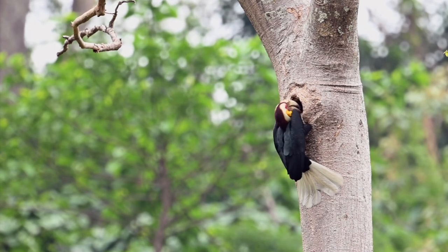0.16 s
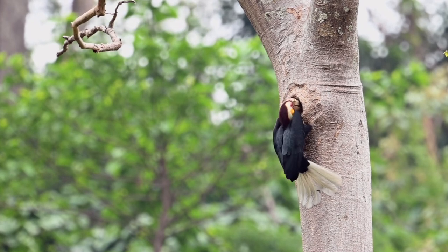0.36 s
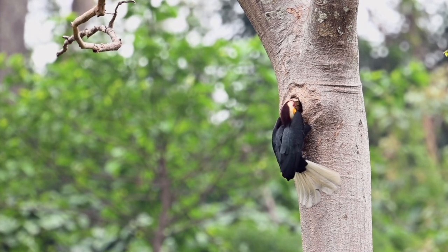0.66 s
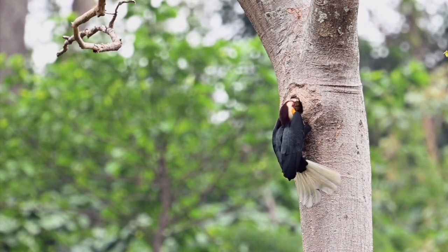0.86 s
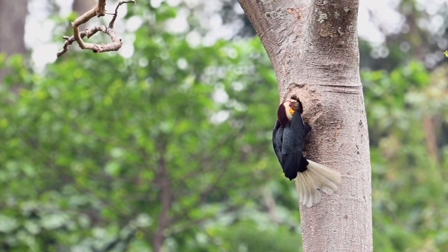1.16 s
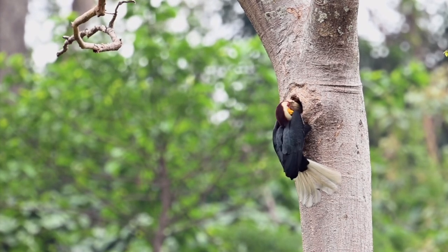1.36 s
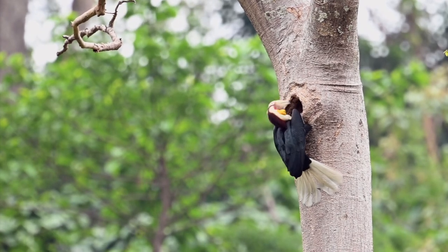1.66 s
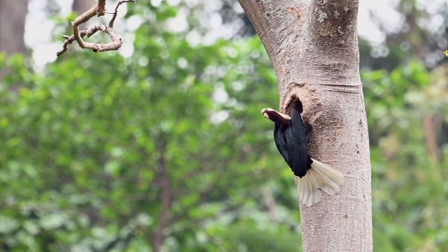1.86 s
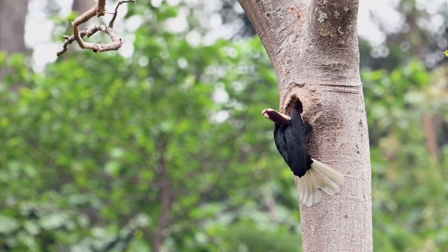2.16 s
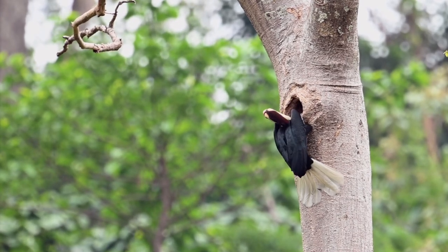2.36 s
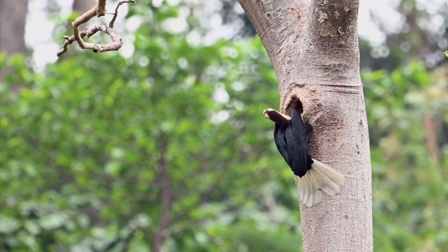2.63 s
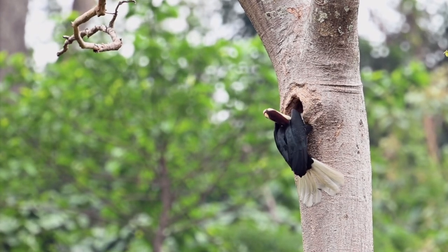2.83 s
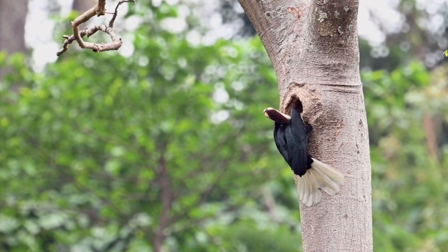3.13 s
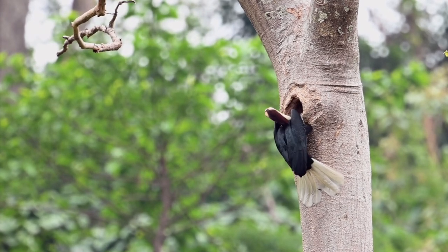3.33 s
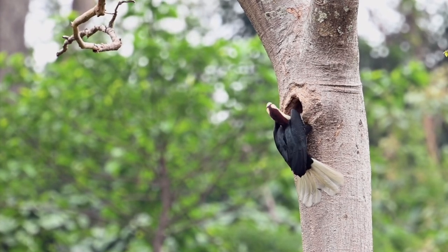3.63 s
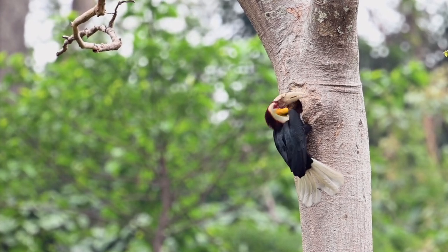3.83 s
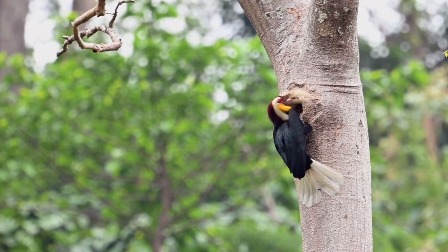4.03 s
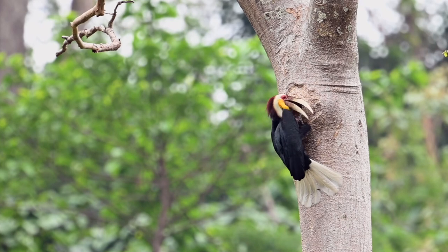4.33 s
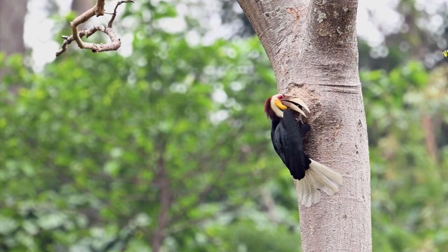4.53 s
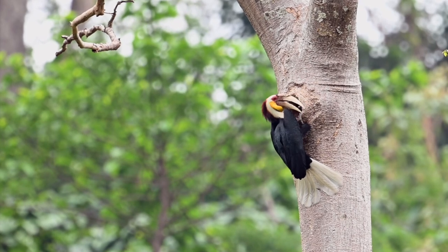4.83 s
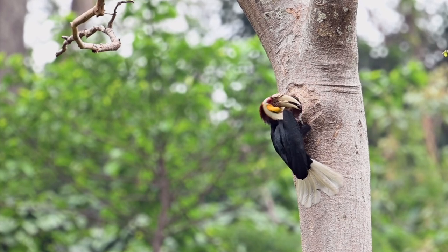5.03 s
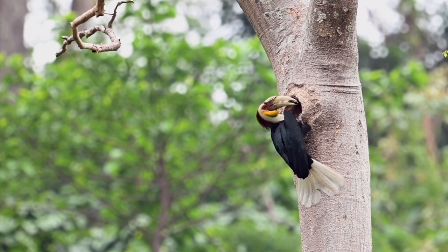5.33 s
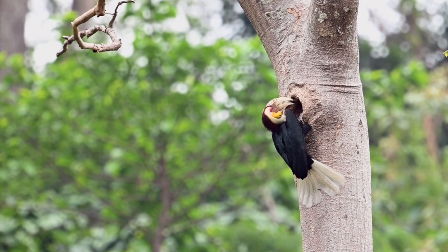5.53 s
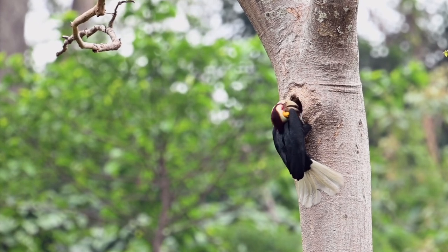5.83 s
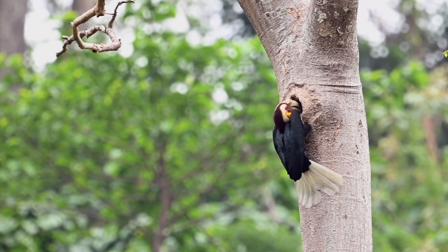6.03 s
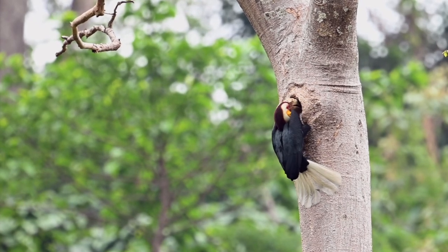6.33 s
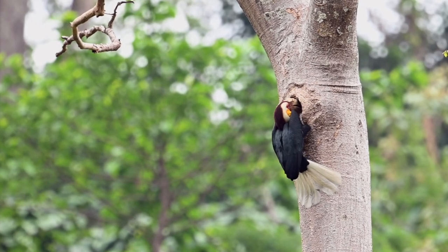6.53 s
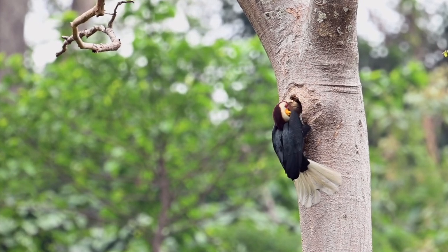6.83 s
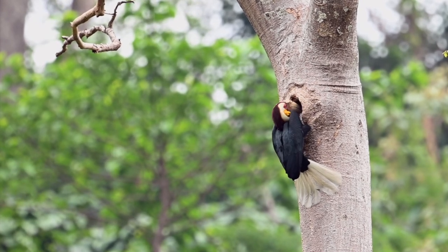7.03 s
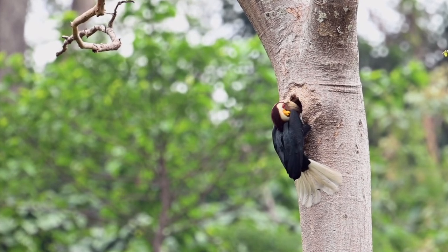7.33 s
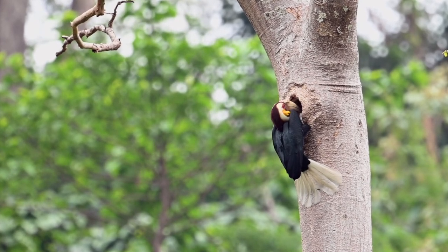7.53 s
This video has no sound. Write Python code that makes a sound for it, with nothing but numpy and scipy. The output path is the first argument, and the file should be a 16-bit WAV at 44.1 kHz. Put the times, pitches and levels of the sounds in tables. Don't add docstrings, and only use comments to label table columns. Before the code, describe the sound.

In an open forest, a breezy outdoor stereo microphone picks up low fluttering rumble and soft knocks of wind, heaviest on the left around the middle. An even, piercing insect tone runs throughout. Distant birds repeat tiny descending notes about every half second. A begging chick gives breathy, scratchy calls near the start, middle and end; high chirps come in two bursts, with small dry ticks.

```python
import sys
import numpy as np
from scipy import signal
from scipy.fft import rfft, irfft
from scipy.io import wavfile
from scipy.ndimage import uniform_filter1d

SR = 44100
rng = np.random.default_rng(int(sys.argv[2]) if len(sys.argv) > 2 else 0)


def file_out(sig):
    cols = np.atleast_2d(sig).T
    lim = np.clip(cols, -1, 1)
    pcm = np.round(lim * 32767).astype(np.int16)
    wavfile.write(sys.argv[1], SR, pcm)


def gain_from_db(level_db):
    decades = np.asarray(level_db, float) / 20
    return 10 ** decades


N = 338688
T = np.arange(N) / SR
F = np.maximum(np.fft.rfftfreq(N, 1 / SR), 1)


def level(x, db):
    return x * gain_from_db(db) / np.sqrt(np.mean(x ** 2))


def colour(x, points):
    hz, db = np.transpose(points)
    gain_db = np.interp(np.log(F), np.log(hz), db, db[0] - 31, -200)
    return irfft(rfft(x) * gain_from_db(gain_db), N)


def walk(rate_hz):
    k = int(SR / rate_hz)
    held = np.repeat(rng.standard_normal(N // k + 1), k)
    x = uniform_filter1d(uniform_filter1d(held, k), k)[:N]
    return x / x.std()


def even(x, span_s, share):
    power = uniform_filter1d(x ** 2, int(span_s * SR)) / np.mean(x ** 2)
    return x / (power + 0.038) ** (share / 2)


def add(out, start_s, x):
    i = int(start_s * SR)
    x = x[max(-i, 0):N - i]
    out[max(i, 0):max(i, 0) + len(x)] += x


def place(x, pan_db, lag_ms, wet_db, t60):
    t = np.arange(int(t60 * SR)) / SR
    decay = np.exp(-np.log(1000) * t / t60) * (1 - np.exp(-t / 0.005))
    haze = rng.standard_normal((2, len(t))) * decay
    haze = haze / np.sqrt(np.sum(haze ** 2, 1, keepdims=True))
    left = irfft(rfft(x) * np.exp(-2j * np.pi * F * lag_ms / 1000), N)
    direct = np.array([left * gain_from_db(pan_db / 2), x * gain_from_db(-pan_db / 2)])
    return direct + gain_from_db(wet_db) * signal.fftconvolve(x[None], haze, axes=1)[:, :N]


def notes(rows, fade, flutter_db):
    out = np.zeros(N)
    for start_s, length_s, hz0, hz1, db, bend in rows:
        u = np.arange(int(length_s * SR)) / (length_s * SR)
        hz = hz1 + (hz0 - hz1) * (1 - u) ** bend
        shape = np.sin(np.pi * u) ** 0.12 * np.exp(-fade * u)
        add(out, start_s, gain_from_db(db + 6.0) * shape * np.sin(2 * np.pi * np.cumsum(hz) / SR))
    return out * gain_from_db(flutter_db * walk(200))


def phrases(phrase, starts):
    rows = []
    for start_s, db in starts:
        for offset_s, length_s, hz0, hz1, note_db, bend in phrase:
            a, b = rng.standard_normal(2)
            rows.append((start_s + offset_s, length_s, hz0 * (1 + 0.015 * a), hz1 * (1 + 0.014 * a),
                         db + note_db + 0.97 * b, bend))
    return rows


def leaves():
    # pitch_hz, level_db (per Hz)
    rustle_db = [(60, -39), (120, -44), (190, -16), (273, -9), (879, -11.5), (952, -9.5), (1050, -13),
                 (2650, -19), (3600, -25), (4680, -104), (7920, -120)]
    hiss_db = [(4100, -40), (4220, 0.5), (4700, 0.5), (5200, -5.5), (6300, -7), (8000, -5.5), (9000, -10.5),
               (12000, -15), (15600, -13.5), (15750, -60)]
    alike = np.interp(np.log(F), np.log([150, 500, 1400, 2500, 3300, 6000]), [.25, .65, .62, .1, -.3, .1])
    left, other = (rfft(rng.standard_normal(N)) for _ in range(2))
    pair = irfft([left, alike * left + np.sqrt(1 - alike ** 2) * other], N)
    rustle = level(colour(pair, rustle_db), -52) * gain_from_db(.6 * walk(3))
    hiss = irfft(rfft(colour(pair, hiss_db)) * (F > 3600), N)
    return rustle + level(hiss, -55.0) * gain_from_db(0.76 * walk(9) + np.array([[.8], [-.8]]))


def insects():
    # pitch_hz, spread_hz, level_db, left_minus_right_db, left_lead_rad, likeness (0-1)
    singers = [(3999, 23.3, -40.5, 5, 2, 0.89), (4089.4, 14.7, -37.5, 2.5, 2.5, 0.48),
               (3975, 15.4, -49.5, -12, 2, 0.5), (3946, 16.4, -46.5, -4, 3, 0.71),
               (3877, 22, -57.5, -13.5, 2, 0.26), (3820, 21, -56, 3, 2, 0.65),
               (4043, 16.4, -47, 1, 2.5, 0.5), (4140, 40, -64, 2, 3, 0.4), (3730, 37, -63, -2, 3, 0.6),
               (3596, 43, -68, 9, 1.5, 0.1), (3676, 8.3, -66, -12.5, 4.5, 0.54),
               (3238, 83, -61.5, 0, 3.5, 0.46), (4770, 80, -63.5, -2, -2.5, 0.96),
               (8200, 24, -75, -7, 0, 0.1), (8900, 28, -73.5, 1, 0.5, 0.2), (9535, 28, -73, 5, 1, 0.7),
               (10370, 32, -73.5, 9, -2, 0), (11240, 33, -77, 10, -1, 0.5), (12700, 60, -83, 1, 5, .1),
               (14700, 90, -84, 8, 1, 0)]
    # time_s, level_db
    swell = [(0, -36.5), (.3, -37.5), (1.2, -40.5), (1.5, -38), (2.3, -39.5), (2.5, -38.5), (2.8, -39.5),
             (3.4, -39), (3.7, -37), (4.1, -40.5), (4.9, -38), (5.5, -40.5), (6.1, -40.5), (6.7, -38),
             (7.1, -40.5), (7.4, -40), (7.68, -38)]
    out = np.zeros((2, N))
    for hz, spread_hz, db, pan_db, lead, alike in singers:
        alike = np.clip(alike, 0, 1)
        band = np.exp(-((F - hz) / spread_hz) ** 2 / 4)
        near, far = (rng.standard_normal((len(F), 2)) @ [1, 1j] * band for _ in range(2))
        pair = irfft([near * np.exp(1j * lead), alike * near + np.sqrt(1 - alike ** 2) * far], N)
        throb_db = .5 if hz < 5000 else 3
        sway_db = throb_db * walk(12) + np.array([[pan_db], [-pan_db]]) / 2
        out += level(even(pair, .05, .85), db) * gain_from_db(sway_db)
    s, db = np.transpose(swell)
    return out * gain_from_db(np.interp(T, s, db - db.mean()))


def crackle():
    # time_s, level_db
    twigs = [(0.666, -46), (1.151, -46), (1.508, -46), (2.845, -45), (3.286, -54), (4.782, -46),
             (4.827, -41), (4.894, -46), (5.004, -46), (5.57, -46), (6.495, -44), (7.055, -45)]
    ticks = np.zeros((2, N))
    for (at_s, db), pan_db in zip(twigs, rng.uniform(-6, 6, len(twigs))):
        ticks[:, int(at_s * SR)] = gain_from_db(db + 13.0 + np.array([pan_db, -pan_db]))
    return colour(ticks, [(7000, -30), (11000, -8), (14000, 0), (20000, 0)])


def mid_bird():
    # offset_s, length_s, first_hz, last_hz, level_db, bend
    phrase = [
        (.003, .019, 2210, 1350, 0, .7),
        (.053, .017, 2190, 1500, 1.5, .7),
        (.07, .018, 1500, 1440, -4, 1),
        (.163, .019, 2250, 1430, 1, .7),
        (.223, .036, 2030, 1545, -1, 4),
    ]
    # start_s, level_db
    starts = [(0.381, -53), (0.983, -49), (1.591, -54), (2.195, -56), (2.791, -56.5), (3.389, -60),
              (3.993, -51.5), (4.592, -51), (5.19, -57.5), (5.79, -57), (6.394, -57), (7.007, -55)]
    return place(notes(phrases(phrase, starts), fade=.7, flutter_db=1.2), -5, .12, wet_db=-6, t60=.6)


def echoed(x):
    # delay_s, level_db
    trunks = [
        (.037, -12.5),
        (.083, -13.5),
        (.15, -10.5),
    ]
    return x + sum(gain_from_db(db) * np.roll(x, int(s * SR)) for s, db in trunks)


def low_bird():
    # offset_s, length_s, first_hz, last_hz, level_db, bend
    phrase = [
        (.002, .021, 1340, 1130, 1, .5),
        (.02, .02, 1080, 870, -3.5, 2.5),
        (.072, .022, 1280, 930, 0, .9),
        (.139, .048, 1230, 1005, 0, 3),
    ]
    # start_s, level_db
    starts = [(0.414, -52.5), (1.07, -55.5), (1.71, -55), (2.355, -50.5), (3.009, -50.5), (3.664, -54),
              (4.324, -53.5), (4.984, -52.5), (5.654, -48.5), (6.325, -51.5), (6.989, -52.5), (7.411, -69)]
    # start_s, length_s, first_hz, last_hz, level_db
    asides = [(.64, 0.019, 1010, 940, -57), (0.723, 0.027, 1053, 900, -56), (1.94, 0.041, 1050, 993, -60),
              (2.272, 0.022, 1190, 1100, -55.5), (2.291, .028, 928, 890, -55),
              (2.915, 0.025, 858, 896, -54), (3.568, 0.026, 836, 915, -55), (4.216, .035, 950, 870, -60),
              (4.868, 0.066, 950, 878, -64), (5.545, .06, 870, 880, -61), (7.408, .035, 1235, 896, -57.5)]
    song = phrases(phrase, starts) + [(*row, 1.2) for row in asides]
    return place(echoed(notes(song, fade=.2, flutter_db=2)), -2.5, .07, wet_db=-1.5, t60=.98)


def arc():
    # time_s, pitch_hz, level_db
    arch = [(4.59, 2270, -75), (4.605, 2300, -59), (4.665, 2570, -57), (4.68, 2625, -48),
            (4.745, 2690, -46), (4.768, 2670, -48), (4.782, 2510, -56), (4.79, 2480, -80)]
    s, hz, db = np.transpose(arch)
    phase = 2 * np.pi * np.cumsum(np.interp(T, s, hz)) / SR
    return gain_from_db(np.interp(T, s, db, -200, -200)) * np.sin(phase)


def whistles():
    # start_s, length_s, first_hz, last_hz, level_db
    curved = [(.412, 0.07, 1820, 2190, -65), (.5, .05, 2100, 2130, -67), (.565, 0.13, 2300, 2370, -65.5),
              (0.779, 0.17, 2300, 2380, -70), (0.79, 0.036, 2500, 2510, -62), (.9, .05, 2470, 2500, -68),
              (2.195, .075, 1764, 2200, -65), (2.265, .1, 2210, 2190, -66), (3.495, .045, 2780, 3050, -60),
              (3.52, 0.056, 2940, 2750, -62), (4.772, 0.06, 3100, 2930, -63),
              (1.07, 0.061, 1325, 1310, -67)]
    slides = [
        (4.605, .072, 2750, 3090, -62),
        (4.785, .025, 3470, 3400, -62),
        (4.805, .05, 3390, 3650, -59),
    ]
    song = [(*row, 2.8) for row in curved] + [(*row, 1) for row in slides]
    return place(notes(song, fade=.1, flutter_db=3.5) + arc(), -2.5, .06, wet_db=-6, t60=.35)


def chirps():
    # start_s, length_s, first_hz, last_hz, level_db
    song = [(2.368, 0.098, 5450, 5370, -63), (2.454, 0.12, 6800, 5640, -57),
            (2.591, 0.095, 6850, 5770, -53.5), (2.727, 0.077, 6940, 5960, -51.5),
            (2.862, 0.05, 6450, 6170, -53), (2.987, 0.053, 6700, 6700, -60),
            (5.458, 0.085, 6400, 5050, -65), (6.238, .05, 6000, 5750, -66), (6.34, 0.045, 6600, 5960, -63),
            (6.46, 0.07, 6560, 6400, -66), (7.288, 0.04, 5950, 5530, -61), (7.322, 0.11, 5530, 5420, -54),
            (7.449, 0.092, 6720, 5740, -52), (7.586, 0.062, 7030, 5940, -51.5)]
    dry_song = notes([(*row, 3.8) for row in song], fade=.8, flutter_db=2.8)
    return place(dry_song, -3.5, .16, wet_db=0.5, t60=.5)


def rasp():
    # start_s, length_s, first_hz, last_hz, level_db, hoarseness (0-1)
    calls = [
        (0.548, 0.59, 1620, 1538, -55, 0.66),
        (2.999, 0.67, 1570, 1479, -52.5, 0.68),
        (5.646, 0.45, 1588, 1482, -48.5, .5),
        (6.862, 0.22, 1530, 1600, -60, 0.54),
    ]
    hoarse_db = [0, 0, 3.5, -4, -9]
    steady_db = [-4, -8, -1, 1, -13]
    out, shake, flutter = np.zeros(N), walk(500), walk(120)
    for start_s, length_s, hz0, hz1, db, hoarse in calls:
        u = np.arange(int(length_s * SR)) / (length_s * SR)
        part = slice(int(start_s * SR), int(start_s * SR) + len(u))
        hz = hz0 + (hz1 - hz0) * (.3 * u + .7 * u ** 6)
        shape = np.sin(np.pi * u ** .4) ** .4 * gain_from_db(3 * hoarse * flutter[part])
        steady = (.004, 1.1 - 1.1 * min(hoarse, 1), steady_db)
        rough = (.11 * hoarse, .75, hoarse_db)
        for depth, share, gains_db in (steady, rough):
            phase = 2 * np.pi * np.cumsum(hz * (1 + depth * shake[part])) / SR
            stack = sum(gain_from_db(g) * np.sin((k + 1) * phase) for k, g in enumerate(gains_db))
            add(out, start_s, share * level(stack, db) * shape)
    return out


def tap():
    # time_s, peak_db, pitch_hz, damping_per_s
    taps = [
        (4.32, -28, 3000, 2800),
        (6.339, -29, 2410, 1300),
    ]
    t, out = np.arange(400) / SR, np.zeros(N)
    for at_s, db, hz, damping in taps:
        add(out, at_s, gain_from_db(db) * np.sin(2 * np.pi * hz * t) * np.exp(-damping * t))
    return out


def gasps():
    # start_s, length_s, level_db, resonance_scale (smaller = longer throat)
    breaths = [
        (0.554, 0.65, -61, 1),
        (3.0, 0.69, -60.5, 1.02),
        (3.73, 0.15, -56, 0.93),
        (5.65, 0.66, -58.5, 0.94),
        (6.202, 0.27, -64, 1.04),
        (6.85, 0.18, -56.5, 0.93),
    ]
    # pitch_hz, spread_hz, level_db
    resonances = [(3010, 560, -2), (4450, 160, 5), (6160, 590, -3.5), (10100, 1100, -12)]
    out, air, flutter = np.zeros(N), rfft(rng.standard_normal(N)), gain_from_db(5.0 * walk(60))
    for start_s, length_s, db, scale in breaths:
        gape = sum(gain_from_db(g) * np.exp(-((F - hz * scale) / spread_hz) ** 2 / 2) for hz, spread_hz, g in resonances)
        u = np.clip((T - start_s) / length_s, 0, 1)
        out += level(irfft(air * gape, N), db) * np.sin(np.pi * u ** 0.78) ** 0.71
    return out * flutter


def chick():
    voice = place(rasp() + tap(), 2.6, -0.11, wet_db=-7, t60=0.98)
    return voice + place(gasps(), 2.5, -0.14, wet_db=0.5, t60=0.62)


def gusts(rows):
    lull_db, rise_db_per_s, fall_db_per_s = -56.5, 369, 297
    power, t = gain_from_db(lull_db) ** 2, T[::32]
    for start_s, length_s, db in rows:
        before_s = np.maximum(start_s - t, 0)
        after_s = np.maximum(t - start_s - length_s, 0)
        power = power + gain_from_db(db - rise_db_per_s * before_s - fall_db_per_s * after_s) ** 2
    return np.interp(T, t, np.sqrt(power))


def rumble(rows):
    # pitch_hz, level_db
    buffet_db = [(20, -8), (45, 0.5), (75, 2.5), (110, -2.5), (170, -11), (260, -23), (450, -31.5),
                 (900, -42)]
    slow_air_hz, bright_at_db = 70, -35.5
    air = level(even(colour(rng.standard_normal(N), buffet_db), 0.0415, 0.78), -0.36)
    strength = gusts(rows)
    dull = irfft(rfft(air) / (1 + (F / slow_air_hz) ** 4), N)
    opening = strength / (strength + gain_from_db(bright_at_db)) * 1.86
    return strength * (dull + (air - dull) * opening)


def eddies(rows, turns, lean=0):
    t, out = np.arange(-1800, 1800) / SR, np.zeros(N)
    for at_s, db, hz in rows:
        twist = .5 * rng.standard_normal()
        swing = -np.cos(2 * np.pi * hz * t + lean + twist)
        passing = np.exp(-np.abs(t * hz / (0.47 * turns)) ** 1.45)
        add(out, at_s + t[0], gain_from_db(db + 1.0) * swing * passing)
    return out


def wind():
    # start_s, length_s, level_db
    left_gusts = [(0, 0.029, -27), (.1, .27, -36.5), (.42, 0.039, -40), (.56, 0.54, -36.5),
                  (1.17, 0.14, -43.5), (1.42, 0.16, -32.5), (1.7, 0.18, -37.5), (2.06, 0.21, -40.5),
                  (1.96, 0.065, -50), (2.32, 0.27, -47.5), (2.53, 0.14, -37), (2.75, 0.24, -34.5),
                  (3.1, 0.4, -31.5), (3.52, 0.21, -36.5), (3.78, 0.082, -39), (3.89, 0.19, -32.5),
                  (4.12, 0.29, -37.5), (4.46, 0.1, -33.5), (4.62, 0.19, -45.5), (4.85, 0.41, -36.5),
                  (5.34, 0.46, -35.5), (5.8, 0.77, -36.5), (6.64, .2, -33.5), (6.9, 0.35, -36),
                  (7.26, 0.26, -37.5), (7.54, 0.14, -33)]
    right_gusts = [(.07, 0.071, -47), (.34, 0.18, -46), (.6, 0.15, -41.5), (.85, 0.32, -44.5),
                   (1.262, 0.34, -45), (1.65, 0.16, -45.5), (2.697, 0.058, -48), (3.296, 0.12, -32.5),
                   (3.5, 0.24, -47.5), (4.174, 0.2, -36.5), (4.382, 0.32, -46.5), (4.817, 0.32, -43),
                   (5.39, 0.043, -42), (5.48, 0.056, -34), (5.6, .1, -53), (5.75, 0.44, -41),
                   (6.19, 0.98, -45), (7.02, 0.087, -39), (7.152, 0.16, -42.5), (7.4, 0.37, -41)]
    # time_s, peak_db, pitch_hz
    thumps = [(.032, -20, 101), (.057, -20.5, 96), (.199, -24, 90), (1.517, -19, 214), (1.535, -17.5, 93),
              (1.718, -21.5, 103), (1.808, -25, 78), (2.798, -24, 91), (2.936, -19, 202), (3.111, -29, 86),
              (3.179, -18.5, 158), (3.31, -13, 213), (3.357, -20, 88.9), (3.44, -16.5, 94),
              (3.474, -13, 126), (3.965, -23, 88), (4.073, -18.5, 131), (4.245, -30, 210),
              (4.514, -21, 103), (4.536, -20, 89), (5.478, -17.5, 91), (5.643, -23, 104), (5.735, -16, 124),
              (5.74, -24.5, 295), (5.54, -27, 212), (6.812, -19, 109), (7.073, -14, 128), (7.174, -21, 101),
              (7.204, -20.5, 122), (7.537, -28, 116)]
    # time_s, peak_db, pitch_hz
    more_thumps = [
        (3.386, -19, 89),
        (3.458, -19.5, 180),
        (1.053, -31, 124),
        (3, -33, 110),
    ]
    # time_s, peak_db, pitch_hz
    rolls = [(.133, -24.5, 114), (.73, -20.5, 79), (1.063, -24, 78), (1.47, -29, 103), (2.586, -24.5, 101),
             (2.766, -21.5, 111), (2.906, -15, 177), (2.993, -28, 149), (3.251, -22.5, 138),
             (3.334, -25, 119), (3.697, -26, 87.5), (4.561, -20.5, 103), (5.016, -23.5, 77.4),
             (5.175, -22.5, 100), (5.604, -28.5, 91.5), (5.673, -19.5, 111), (5.89, -32, 189),
             (5.985, -22, 110), (6.174, -22.5, 96), (6.414, -22, 75.5), (6.7, -20.5, 131),
             (6.786, -16, 123), (7.035, -17.5, 143), (7.28, -30, 185), (2, -42, 240), (2.4, -40.5, 190),
             (5.2, -31, 140), (7.39, -32.5, 189), (7.636, -20, 85)]
    # time_s, peak_db, pitch_hz
    snaps = [
        (4.3185, -11, 252),
        (4.33, -20, 232),
        (4.49, -25, 168),
    ]
    # time_s, peak_db, pitch_hz
    right_rolls = [(.665, -29, 74), (1.113, -32, 118), (1.758, -22.5, 130), (3.307, -22.5, 136),
                   (3.332, -21, 152), (3.372, -21, 154), (3.407, -23, 114), (4.243, -28, 73),
                   (4.268, -23, 98), (4.332, -17, 108), (6.113, -25.5, 98), (7.056, -21, 73),
                   (7.099, -23, 94), (7.619, -31, 86)]
    left = rumble(left_gusts) + eddies(thumps, turns=0.95) + eddies(more_thumps, turns=0.95)
    left += eddies(rolls, turns=1.9) + eddies(snaps, turns=0.88, lean=1.6)
    right = rumble(right_gusts) + eddies(right_rolls, turns=1.16)
    out = np.array([left, right])
    return colour(out - 1.35 * out ** 2, [(12, -22), (35, 1.5), (70, 1.0), (20000, 5.0)])


def scene():
    background = leaves() + insects() + crackle()
    birds = mid_bird() + low_bird() + whistles() + chirps()
    return background + birds + chick() + wind()


def roll_off(x):
    return signal.sosfilt(signal.butter(12, 15800, fs=SR, output="sos"), x)


def record(dry):
    mix = np.tanh(1.8 * dry) / 1.8
    return roll_off(mix)


dry = scene()
out = record(dry)
file_out(out)
```